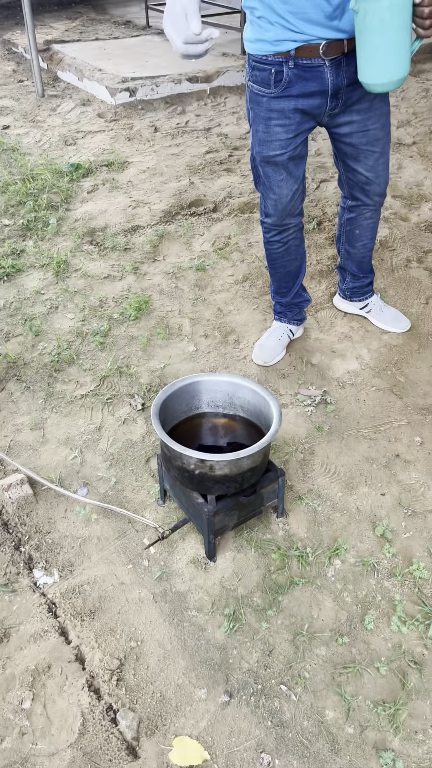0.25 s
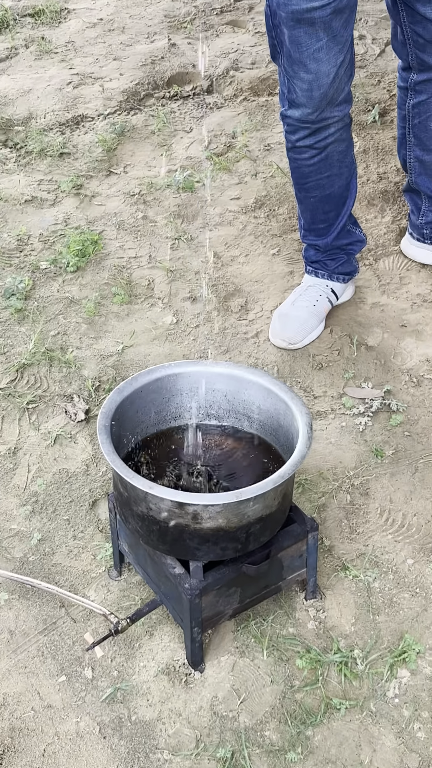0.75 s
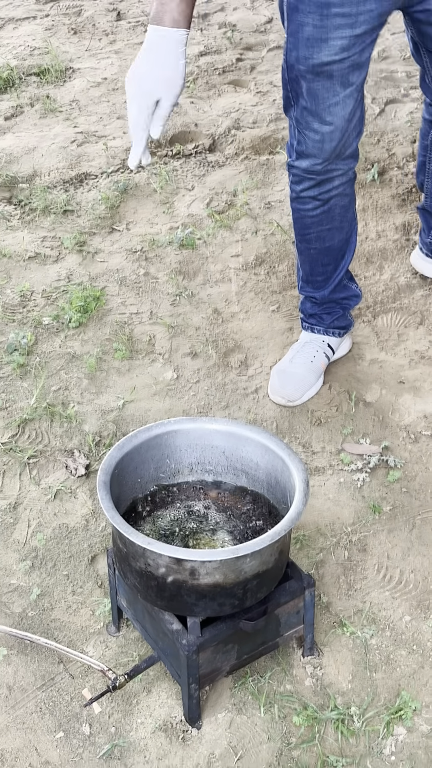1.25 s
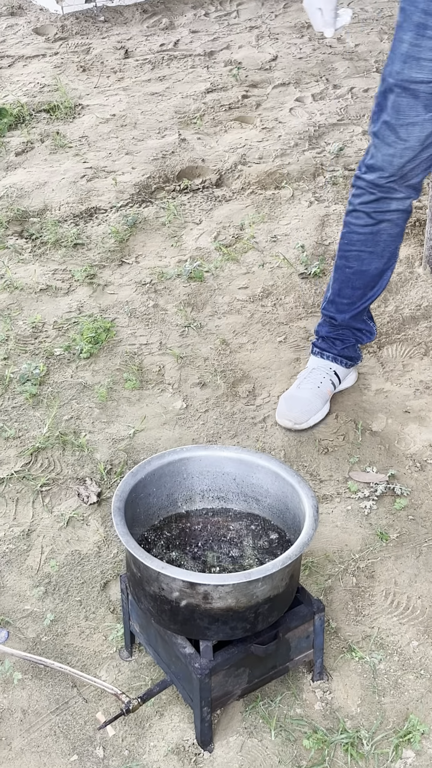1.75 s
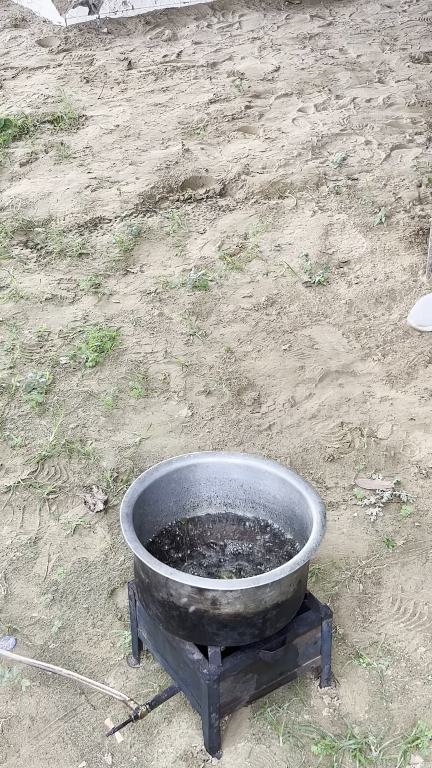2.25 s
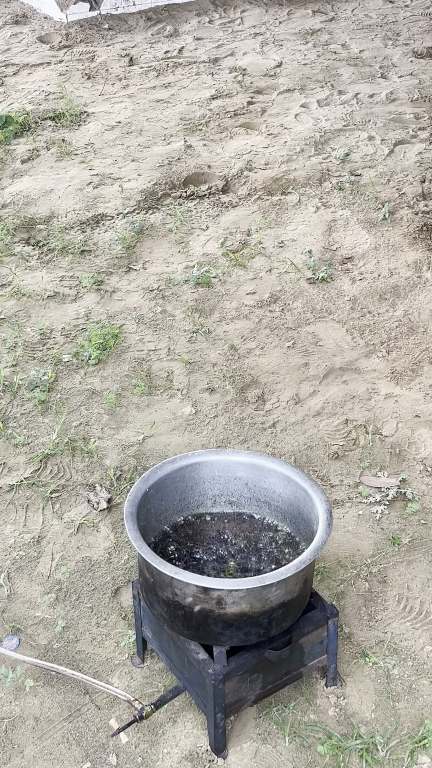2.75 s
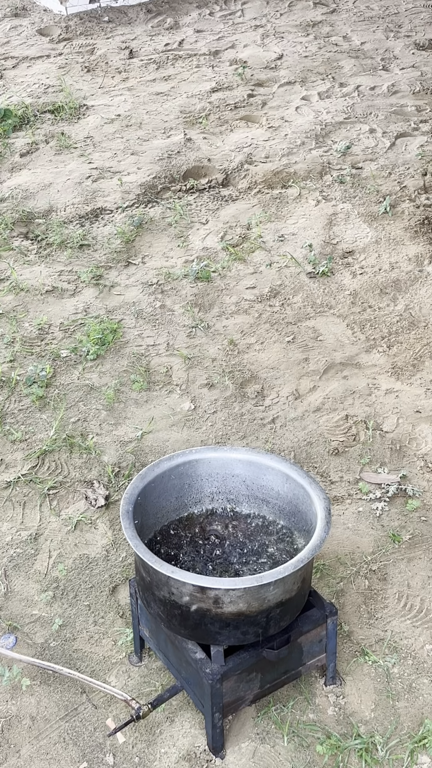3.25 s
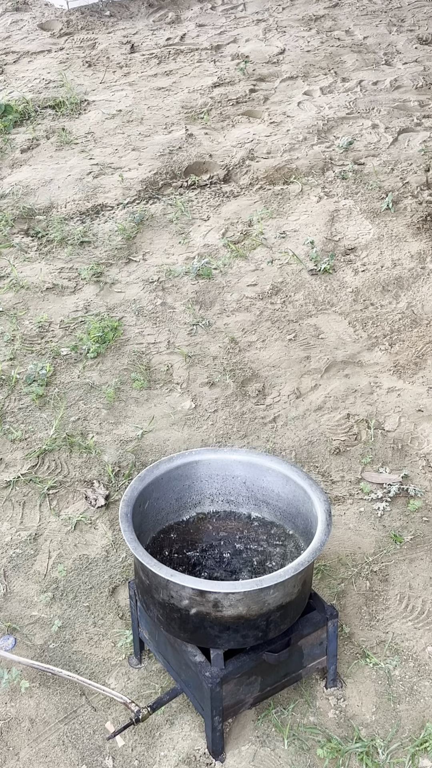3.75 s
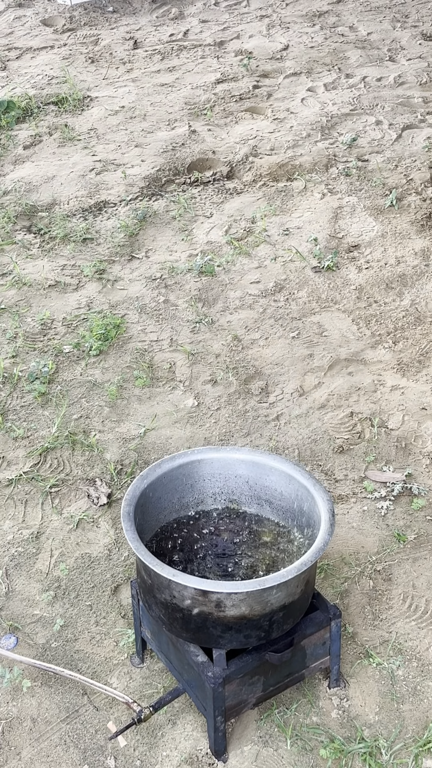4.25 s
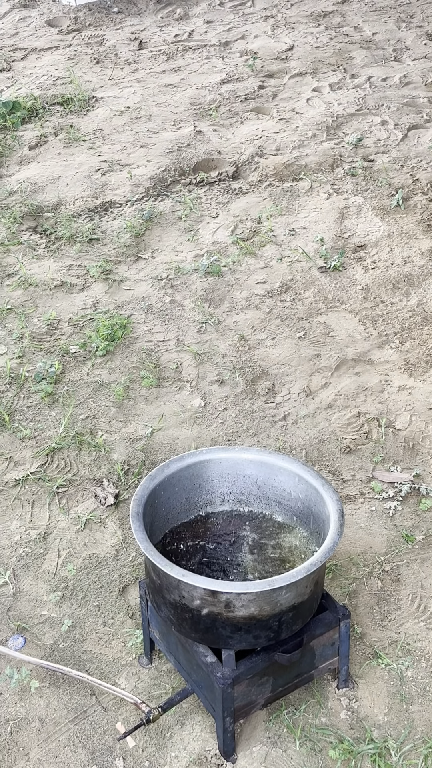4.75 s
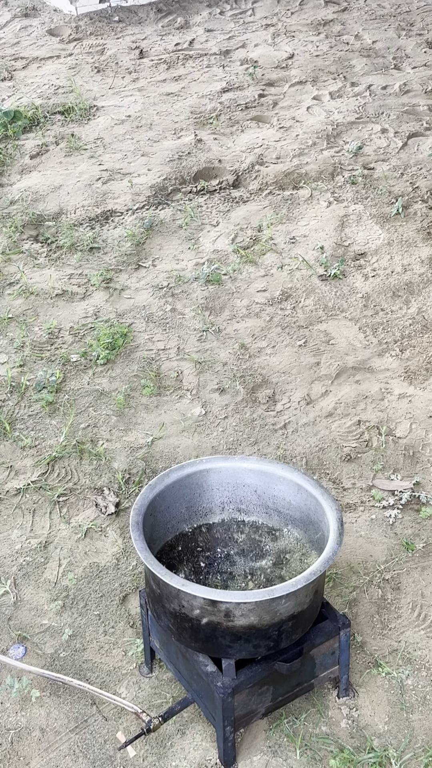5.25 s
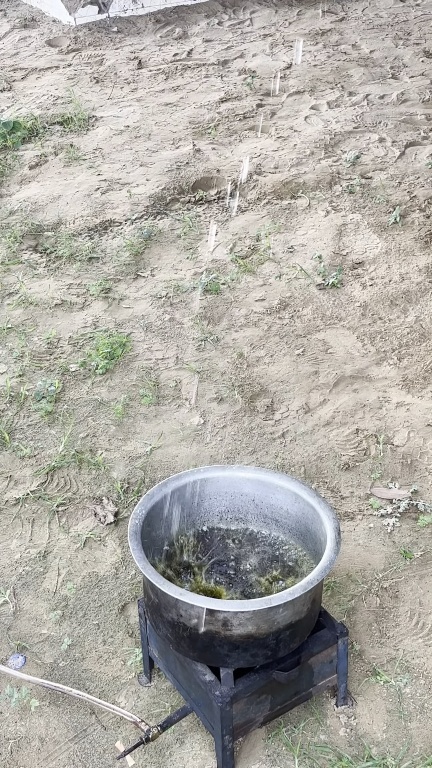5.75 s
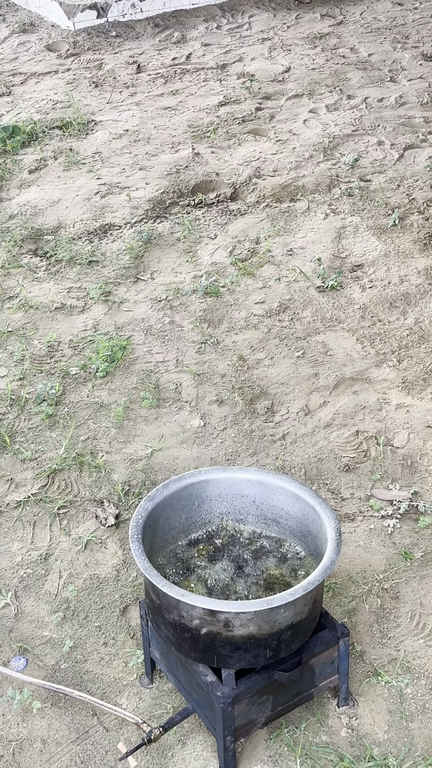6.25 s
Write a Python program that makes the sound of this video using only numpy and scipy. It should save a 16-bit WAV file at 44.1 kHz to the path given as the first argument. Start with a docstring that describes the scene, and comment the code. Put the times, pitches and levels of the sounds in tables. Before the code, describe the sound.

Close stereo pickup in open air with no echo: small droplets snap, then tossed water makes hot oil fry, fine hiss first, then thicker crackle. Bright spits crack out at random. Sunken water boils up in knocking, hollow plops and rough steam sputters that ring the metal pot, growing loud midway. A fresh brief sizzle comes late. Behind lie a steady burner rush, low rumble, a fading engine hum and a wavering distant drone.

```python
"""Water is tossed into hot oil in a large metal pot on a gas stove, out of doors.
The oil sizzles and spits: random clicks ring at the pitches of small and large bursting bubbles.
As the water sinks and boils, steam bubbles plop harder in the pot's hollow, as short swelling tones.
A second, smaller splash revives the sizzle near the end.
Behind it the burner rushes as filtered noise, and far engines hum as wavering sine tones."""
import sys
import numpy as np
from scipy import signal
from scipy.fft import rfft, irfft, next_fast_len
from scipy.io import wavfile
from scipy.ndimage import uniform_filter1d

SR = 44100
rng = np.random.default_rng(int(sys.argv[2]) if len(sys.argv) > 2 else 0)


def digitize_waveform(pressure):
    """Quantize a signal to 16-bit integers and store it at the path in sys.argv[1].

    Rows of a 2-D input are taken as channels; values are limited to [-1, 1].
    """
    field = np.atleast_2d(pressure).T
    bounded = np.clip(field, -1, 1)
    quanta = np.round(bounded * 32767).astype(np.int16)
    wavfile.write(sys.argv[1], SR, quanta)


N = 286209
TIME = np.arange(N) / SR  # seconds
PADDED = 2 * next_fast_len(N // 2 + 4096)  # room for filter tails
HZ = np.arange(PADDED // 2 + 1) * SR / PADDED


def from_db(db):
    """Turn decibels into gain."""
    return 10 ** (np.asarray(db) / 20)


def rms_one(x):
    """Scale to an rms of 1."""
    return x / np.sqrt(np.mean(x ** 2) + 1e-20)


def in_time(rows):
    """Draw each column of a table as a curve over time."""
    seconds, *columns = np.transpose(rows)
    return [np.interp(TIME, seconds, column) for column in columns]


def over_hz(points):
    """Join the points of a spectrum along a log-frequency axis."""
    hz, value = np.transpose(points)
    return np.interp(np.log(HZ + 1), np.log(hz), value)


def colour(x, points):
    """Shape the spectrum with a minimum-phase filter, so that nothing sounds before its cause."""
    cepstrum = irfft(np.log(from_db(over_hz(points))))
    # Folding the second half onto the first gives the minimum phase.
    cepstrum[1:PADDED // 2] *= 2
    cepstrum[PADDED // 2 + 1:] = 0
    response = np.exp(rfft(cepstrum))
    return irfft(rfft(x, PADDED) * response)[..., :N]


def resonance(x, hz, width_hz):
    """Ring at one pitch: a two-pole band-pass with a gain of 1 at its top."""
    r = np.exp(-np.pi * width_hz / SR)
    feed = np.array([1, 0, -1]) * (1 - r * r) / 2
    feedback = [1, -2 * r * np.cos(2 * np.pi * hz / SR), r * r]
    return signal.lfilter(feed, feedback, x + 1e-18)


def drift(rate):
    """Wander at random with an rms of 1, taking a new value `rate` times a second."""
    knots = rng.standard_normal(2 * N // 100)
    return rms_one(np.interp(TIME * rate, np.arange(len(knots)), knots))


def add(out, s, sound):
    """Mix a short sound in at a given second."""
    at = int(np.clip(s * SR, 0, N))
    out[..., at:at + sound.shape[-1]] += sound[..., :N - at]


# Spectrum of the burner. Each row: frequency in Hz, relative level in dB.
BURNER_COLOUR = [(100, -2.5), (210, -2), (320, -11), (500, -8.5), (750, -17.5), (1900, -25.5), (2800, -31),
                 (4800, -33), (9000, -42.5), (15000, -66)]


def burner():
    """Burning gas rushes steadily: noise, mostly alike on both sides."""
    rush = rng.standard_normal(N) + from_db(-17.0) * rng.standard_normal((2, N))
    return from_db(-36.5) * rms_one(colour(rush, BURNER_COLOUR))


# Spectrum of the low rumble. Each row: frequency in Hz, relative level in dB.
RUMBLE_COLOUR = [(20, -6), (38, -28), (82, 1.5), (105, -5.5), (200, -8.5), (320, -15), (800, -53.5)]


def rumble():
    """A low rumble: noise with most of its strength in the bass."""
    return from_db(-33.0) * rms_one(colour(rng.standard_normal(N), RUMBLE_COLOUR))


def hum(hz, level_db):
    """A sine tone whose pitch wanders a little; the level is its rms."""
    turns = np.cumsum(hz * (1 + 0.0021 * drift(rate=10))) / SR
    return from_db(level_db) * np.sqrt(2) * np.sin(2 * np.pi * turns)


# A far engine's path. Each row: time in seconds, middle pitch in Hz, rms level in dB.
ENGINE_PATH = [(0, 58.46, -27.5), (1.9, 57.76, -28), (2.8, 56, -31.5), (3.45, 55.36, -42.5),
               (6.49, 56.6, -38)]


def engines():
    """Two far engines hum: one changes pitch and level, the other fades between 1 and 3 seconds."""
    engine_hz, engine_db = in_time(ENGINE_PATH)
    second_db = np.interp(TIME, [1, 3], [-34, -41])
    return hum(engine_hz, engine_db) + hum(82.25, second_db)


# A distant drone comes and goes.
# Each row: start and end of the full part in seconds, middle pitch in Hz, rms level in dB before wavering.
DRONES = [(0.25, 0.6, 182.3, -37), (2.1, 2.203, 178, -35.5), (2.548, 3.31, 151.3, -35.5),
          (3.74, 4.1, 148.3, -32), (4.703, 5.083, 144.4, -31), (5.29, 5.62, 147, -30.5)]


def drones():
    """A distant drone: tones that waver in level and fade in and out at their ends."""
    out, fade_db_per_s = np.zeros(N), 56
    waver_db = 1.4 * drift(rate=13)
    for start_s, end_s, hz, level_db in DRONES:
        seconds_outside = np.abs(TIME - np.clip(TIME, start_s, end_s))
        out += hum(hz, level_db + waver_db - fade_db_per_s * seconds_outside)
    return out


SIDE_DB = -12.5  # clicks that differ between left and right, against the central ones


def bursts(per_s, spread_db):
    """Random clicks of uneven size; those off the pot's centre differ between left and right."""
    sizes = from_db(spread_db * np.minimum(rng.exponential(1, (2, N)), 5))
    sizes = sizes * rng.choice([-1, 1], (2, N))
    mid, side = sizes * (rng.random((2, N)) < per_s / SR)
    return mid + from_db(SIDE_DB) * side * [[1], [-1]]


ONSET_DB_PER_S = 300  # how fast the frying catches
# Water lands in the oil; a small splash boils off sooner.
# Each row: time in seconds, level change in dB, pace of boiling off (as a factor),
# extra for the spray in dB (scaled by the setting `spray` below).
SPLASHES = [(0.7, 0.5, 0.93, -1.5), (5.72, -1.5, 3.8, 0.5)]


def boil_off(peak_db, lag_s, swell_db, swell_s, hold_s, fade_db_per_s, stray_db, spray=0):
    """Level in dB of one size of bubble: each splash catches, swells, holds and fades, over stray drops."""
    power = from_db(stray_db) ** 2
    for s, splash_db, pace, spray_db in SPLASHES:
        age = TIME - s - lag_s
        attack = ONSET_DB_PER_S * np.minimum(age, 0)
        attack = attack - swell_db * np.exp(-np.maximum(age, 0) / swell_s)
        release = fade_db_per_s * np.maximum(pace * age - hold_s, 0)
        power = power + from_db(peak_db + splash_db + spray * spray_db + attack - release) ** 2
    return 10 * np.log10(power)


def spray_level():
    """Level of the finest spray in dB; it answers a splash first."""
    return boil_off(peak_db=-36.5, lag_s=0.005, swell_db=16.5, swell_s=0.14, hold_s=0.99,
                    fade_db_per_s=4.0, stray_db=-55.0, spray=0.94)


def ticks():
    """Tiny droplets snap at random along with the spray, the first ones ahead of the main splash."""
    clicks = bursts(130, spread_db=4.5)
    high = resonance(clicks, 8600, width_hz=2700)
    low = resonance(clicks, 4560, width_hz=360)
    snaps = rms_one(high + from_db(7.0) * low)
    first_drops = np.interp(TIME, [.27, .3, .7], [0, .6, 1])
    return first_drops * from_db(spray_level() - 3.5) * snaps


# Flurries of tiny bubbles of like size, where a little water meets the oil.
# Each row: middle in seconds, half-width in seconds, middle pitch in Hz, level at the middle in dB.
FLURRIES = [(0.317, 0.015, 3680, -48), (0.385, 0.02, 4200, -51), (0.501, 0.039, 3260, -43.5),
            (0.614, 0.033, 2930, -42.5), (0.668, 0.015, 2750, -39.5), (0.72, 0.0098, 3170, -38),
            (0.815, 0.05, 1890, -35), (1.31, 0.067, 12100, -33.5), (4.35, 0.025, 4060, -33.5),
            (5.308, 0.037, 7740, -39), (5.511, 0.0039, 2960, -23)]


def flurries(count=5):
    """A quick run of tiny bubbles, each ringing near the flurry's pitch."""
    out, t = np.zeros(N), TIME[:SR // 4] - TIME[SR // 8]
    for s, width_s, hz, level_db in FLURRIES:
        struck = rng.random((count, len(t))) < 900 / count / SR  # 900 bubbles a second in all
        clicks = rng.standard_normal((count, len(t))) * struck
        pitches = hz * (1 + 0.11 * np.linspace(-1, 1, count))
        rings = sum(resonance(c, pitch, width_hz=pitch / 28) for c, pitch in zip(clicks, pitches))
        swell = np.exp(-(t / width_s) ** 2)
        add(out, s + t[0], from_db(level_db) * swell * rms_one(rings))
    return out


# Spectrum of the spits. Each row: frequency in Hz, gain in dB.
SPIT_COLOUR = [(1100, 2), (2200, -2.5), (9000, -0.5), (13000, -8.5)]
# The droplets whose bursts stand out of the frying.
# Each row: start in seconds, relative level in dB, centre frequency in Hz.
SPITS = [(0.3622, -36, 4400), (0.396, -39, 5500), (0.422, -30.5, 2300), (0.497, -40, 11500),
         (0.56, -34, 7950), (0.5864, -27, 3480), (0.713, -33.5, 4500), (1.2697, -24, 7000),
         (1.2905, -19, 11000), (1.501, -20, 8900), (2.0585, -27, 7950), (2.4098, -24.5, 9600),
         (2.4958, -14.5, 5060), (2.5375, -18, 3650), (2.6354, -19.5, 8440), (2.6724, -21, 6500),
         (2.8318, -17, 8160), (2.9042, -12.5, 2240), (2.9315, -23, 7000), (2.945, -20, 8600),
         (3.063, -19.5, 7800), (3.1898, -18, 3630), (3.265, -16.5, 8140), (3.2836, -24, 7300),
         (3.6033, -19, 2035), (3.66, -29, 9200), (3.847, -36, 8000), (3.932, -16, 2300),
         (3.982, -23.5, 7500), (4.0853, -20.5, 9100), (4.158, -17, 3140), (4.22, -23, 3300),
         (4.408, -26, 3220), (4.494, -26, 5000), (4.5155, -26.5, 8000), (4.5403, -30, 8200),
         (5.0417, -19.5, 7300), (5.1424, -19, 2190), (5.254, -24.5, 7960), (5.284, -13, 8240),
         (5.7947, -24, 6100), (5.816, -27, 6000), (5.985, -25, 10100), (6.03, -28, 7900),
         (6.059, -22, 4940), (6.227, -19, 3220), (6.243, -19, 4030)]


def spits():
    """A droplet flashes to steam: a short crack, a scatter from the pot's wall, a fizz unlike the others'."""
    out, t = np.zeros((2, N)), TIME[:SR // 8]
    for s, level_db, hz in SPITS:
        age = t * hz / 0.64  # the crack swells in about two thirds of a cycle
        crack = age * np.exp(1 - age) * np.sin(2 * np.pi * hz * t)
        snap_noise = np.exp(-t / 0.00083) * rng.standard_normal(len(t))
        snap = resonance(snap_noise, hz, width_hz=1.1 * hz)
        scatter = from_db(-21.5) * np.exp(-t / 0.003)
        fizz = from_db(-29.5 + 1.7 * rng.standard_normal()) * np.exp(-t / 0.023)
        tail_noise = (scatter + fizz) * rng.standard_normal((2, len(t)))
        tail = 1.38 * resonance(tail_noise, hz, width_hz=hz)
        spit = crack + snap + tail
        first_ms = spit[:, :SR // 1000]
        add(out, s, from_db(level_db + 4.0) * spit / np.std(first_ms))
    return colour(out, SPIT_COLOUR)


def evened(x, span_s):
    """Hold the level at 1 over each span, with the grain left in."""
    power = uniform_filter1d(np.mean(x ** 2, axis=0), int(span_s * SR) + 1)
    return x / np.sqrt(power + 1e-12)


def ringing(clicks, low_hz, high_hz, quality, snap_db, count=50):
    """Each burst snaps, then rings for some cycles at the pitch of its bubble's size."""
    dealt = rng.integers(0, count, N)  # a random size for each click
    pitches = np.geomspace(low_hz, high_hz, count)
    rings = sum(resonance(clicks * (dealt == k), hz, hz / quality) for k, hz in enumerate(pitches))
    return rings + from_db(snap_db) * clicks


# Air in the pot. Each row: resting pitch in Hz, width in Hz, middle lift in dB.
POT_AIR = [(406, 104, 3.5), (540, 170, 12), (660, 44, 7), (1058.4, 65, 18.5), (1150, 63, 3.5),
           (2540, 72, 7.5), (3012, 290, 11)]


def pot(x):
    """The air in the pot rings; swirling steam shifts its pitches, and moving bursts drive it unevenly."""
    out, shift = x, np.cumsum(1 + 0.017 * drift(rate=30)) / SR
    for hz, width_hz, lift_db in POT_AIR:
        # Turn the resonance down to 0 Hz, smooth it there, then turn it back up.
        turn, r = np.exp(2j * np.pi * hz * shift), np.exp(-np.pi * width_hz / SR)
        ring = 2 * (turn * signal.lfilter([1 - r], [1, -r], x * turn.conj())).real
        uneven = from_db(drift(rate=45))
        out = out + (from_db(lift_db) - 1) * uneven * ring
    return out


def burst_rate():
    """Bursts per second: steam bubbles merge and grow fewer after the first splash."""
    first_per_s, last_per_s, merge_s = 2000, 300, 2.1
    age = np.maximum(TIME - SPLASHES[0][0], 0)
    merged = 1 - np.exp(-(age / merge_s) ** 2)
    return first_per_s + (last_per_s - first_per_s) * merged


# Vigour of the sunken water's boil. Each row: time in seconds, relative level in dB.
BOIL_VIGOUR = [(0.7, -51), (0.83, -33.5), (1.04, -32), (1.42, -31.5), (1.91, -23.5), (2.75, -18.5),
               (3.0, -22), (3.5, -18), (4.55, -25), (4.86, -20), (5.12, -30), (5.42, -24), (5.71, -28),
               (5.91, -28), (6.05, -23.5), (6.49, -30.5)]


def boil_level():
    """How hard the sunken water boils, held back until it has sunk; in dB."""
    vigour_db, = in_time(BOIL_VIGOUR)
    return vigour_db + np.interp(TIME, [.7, .82], [-14, 0])


# Spectrum of the boil. Each row: frequency in Hz, gain in dB.
BOIL_COLOUR = [(100, -16), (200, -0.5), (270, 0.5), (340, -1), (450, 5.5), (700, 0), (860, -3),
               (1100, -14.5), (2000, -4.5), (5000, -86)]


def boil(surge_db):
    """Boiling steam pockets burst at low pitches and ring the pot, stirred up by the large bubbles."""
    pockets = bursts(burst_rate(), spread_db=0.1) * from_db(surge_db)
    pockets = pockets + 1.2 * pockets.mean(axis=0)  # long waves reach both sides alike
    pockets = ringing(pockets, low_hz=197.4, high_hz=1308, quality=15.2, snap_db=-16.0)
    level = np.sqrt(from_db(boil_level() - 0.94) ** 2 + churn())
    return level * evened(pot(colour(pockets, BOIL_COLOUR)), span_s=0.028)


# Spectrum of the crackle. Each row: frequency in Hz, gain in dB.
CRACKLE_COLOUR = [(200, -17.5), (600, 8), (900, 1), (1400, 2), (2000, 1.5), (2400, 3), (2700, -14),
                  (3300, -6), (5000, -7), (12000, -86.5)]


def crackle(surge_db):
    """Small bubbles burst at middle pitches, more often than the steam pockets, and ring the pot."""
    level_db = boil_off(peak_db=-20.5, lag_s=0.13, swell_db=16.5, swell_s=0.49, hold_s=1.17,
                        fade_db_per_s=3.0, stray_db=-60)
    small = bursts(2.1 * burst_rate(), spread_db=3.0) * from_db(surge_db)
    small = ringing(small, low_hz=706.4, high_hz=4054, quality=20.4, snap_db=-18.5)
    return from_db(level_db) * evened(pot(colour(small, CRACKLE_COLOUR)), span_s=0.33)


# Spectrum of the sizzle. Each row: frequency in Hz, gain in dB.
SIZZLE_COLOUR = [(800, -11), (2000, 9), (2700, 0.5), (3300, 2), (4500, 0.5), (5500, -5.5), (7500, -5),
                 (15000, -51)]


def sizzle(surge_db):
    """Fine bubbles burst at high pitches, half as clustered, and ring the pot."""
    level_db = boil_off(peak_db=-26.0, lag_s=0.058, swell_db=12, swell_s=0.28, hold_s=0.88,
                        fade_db_per_s=4.5, stray_db=-45.0)
    fine = bursts(1600, spread_db=3.0) * from_db(.5 * surge_db)
    fine = ringing(fine, low_hz=2350, high_hz=7500, quality=66, snap_db=-18.5)
    return from_db(level_db) * evened(pot(colour(fine, SIZZLE_COLOUR)), span_s=0.46)


# Spectrum of the spray. Each row: frequency in Hz, gain in dB.
SPRAY_COLOUR = [(2500, -9), (5000, 17.5), (7000, 11.5), (9000, 12.5), (10800, 8), (12500, 11), (16000, -7)]


def spray():
    """The finest bubbles burst as bare clicks that flicker in level."""
    finest = bursts(4500, spread_db=1.5) * from_db(2.7 * drift(rate=51))
    return from_db(spray_level()) * evened(colour(finest, SPRAY_COLOUR), span_s=1.0)


def frying():
    """Four sizes of bursting bubble together, rising to full level as the water lands."""
    surge_db = drift(rate=70)  # bubbles burst in clusters
    water_lands = from_db(np.interp(TIME, [.25, .6, .72], [-40, -14, 0]))
    return water_lands * (boil(surge_db) + crackle(surge_db) + sizzle(surge_db) + spray())


def puff(hz):
    """A short, rough gasp of steam: noise ringing near one pitch, with rms 1 over its first 5 ms."""
    age = TIME[:SR // 20] / 0.0034  # crest after 3.4 ms
    steam = resonance(rng.standard_normal(len(age)), 1.3 * hz, width_hz=2200)
    gasp = age * np.exp(1 - age) * resonance(steam, hz, width_hz=320)
    return gasp / np.std(gasp[:SR // 200])


# The loudest puffs of steam breaking the surface.
# Each row: time near the crest in seconds, relative level in dB.
SPUTTERS = [(0.845, -22), (1.447, -14.5), (2.956, -9), (3.196, -16), (3.263, -16), (3.73, -16),
            (3.754, -15), (3.807, -13), (4.085, -16), (4.153, -13), (4.222, -10), (4.41, -16), (4.607, -13),
            (4.629, -17), (4.953, -12.5), (5.002, -13.5), (5.142, -9.5), (5.205, -14), (5.444, -14.5),
            (5.773, -17), (5.792, -16), (5.885, -22), (5.947, -15.5), (6.016, -13), (6.244, -15)]


def sputters():
    """Steam tears through the surface and sounds the pot's upper air resonance."""
    out = np.zeros(N)
    for s, level_db in SPUTTERS:
        add(out, s - .003, from_db(level_db - 9) * puff(1030))
    return out


def bubble(hz, swell_s, rise):
    """A tone that swells, dies away and climbs a little in pitch; its envelope peaks at 1."""
    t = TIME[:SR // 8]
    age = t / swell_s
    climbing_hz = hz * (1 + rise * np.tanh((age - 1) / 2))
    return age * np.exp(1 - age) * np.sin(2 * np.pi * np.cumsum(climbing_hz) / SR)


# Deep gulps under the oil. Each row: start in seconds, peak level in dB, pitch at the peak in Hz.
GULPS = [(3.337, -15, 247), (3.827, -18.5, 237), (3.904, -19, 222), (4.764, -19, 241), (4.817, -15.5, 252),
         (5.82, -24.5, 271), (6.415, -20.5, 274)]
# The largest steam bubbles.
# Each row: time of the peak in seconds, peak level in dB, pitch at the peak in Hz,
# rebound level in dB against the peak.
PLOPS = [(1.406, -19, 550, -2.5), (2.204, -14, 538, -17), (2.549, -15, 624, -13), (2.951, -10, 640, -24),
         (3.141, -5, 590, -14), (3.199, -11.5, 586, -21), (3.231, -13, 533, -24), (3.435, -8.5, 406, -20),
         (3.654, -9, 485, -18), (3.731, -9.5, 540, -24), (3.837, -10.5, 530, -5), (3.92, -7.5, 520, -11),
         (3.978, -12, 506, -5), (4.012, -14, 540, -6), (4.145, -9.5, 513, -10), (4.162, -14, 556, -17),
         (4.19, -12, 513, -15), (4.256, -6.5, 654, -21), (4.294, -10, 547, -7), (4.412, -9, 527, -4),
         (4.518, -12.5, 540, -20), (4.702, -15, 550, -19), (4.71, -11, 534, -8.5), (4.743, -15, 540, -18),
         (4.771, -11.5, 493, -18), (4.815, -7, 540, -7), (4.847, -10, 580, -15), (4.988, -14, 595, -9),
         (5.002, -7.5, 570, -7.5), (5.053, -10.5, 567, -17), (5.163, -9, 527, -4), (5.214, -12, 540, -12),
         (5.326, -12, 487, -4), (5.365, -12.5, 483, -25), (5.453, -13, 458, -17), (5.541, -5.5, 540, -6.5),
         (5.886, -13, 660, -28), (6.002, -11, 577, -4.5), (6.151, -17, 678, -7), (6.218, -19, 452, -10),
         (6.415, -11, 600, -30), (6.44, -14.5, 565, -12)]


def plops():
    """Large steam bubbles collapse, rebound and puff into the pot's upper air; deep gulps join them."""
    out, swell_s = np.zeros(N), .0025
    for s, peak_db, hz, rebound_db in PLOPS:
        add(out, s - swell_s, from_db(peak_db) * bubble(hz, swell_s, rise=0.01))
        add(out, s - swell_s, from_db(peak_db - 20.0) * puff(910))
        rebound = bubble(541.4, swell_s=0.006, rise=0.012)
        add(out, s + 0.00518, from_db(peak_db + rebound_db) * rebound)
    for s, peak_db, hz in GULPS:
        add(out, s, from_db(peak_db) * bubble(hz, swell_s=0.011, rise=0.21))
    return out


def churn():
    """Power of the boiling that each large bubble stirs up: it builds quickly and settles more slowly."""
    under_peak_db, rise_s, fall_s = -10.5, .004, 0.019
    power = np.zeros(N)
    for s, peak_db, _, _ in PLOPS:
        age = TIME - s
        decay = np.minimum(np.maximum(-age / rise_s, age / fall_s), 20)
        power += from_db(peak_db + under_peak_db) ** 2 * np.exp(-decay)
    return power


def scene():
    """The pot in front, the yard behind; open air adds no echo."""
    background = burner() + rumble() + engines() + drones()
    return background + ticks() + flurries() + spits() + frying() + sputters() + plops()


LOW_CUT_HZ, TOP_CUT_HZ = 33, 16000
# Phase between two microphone ports. Each row: frequency in Hz, lead of the left in radians.
PORT_PHASE = [(0, 0), (500, -.45), (800, .1), (1400, -.2), (2000, .7), (2550, 2.25), (3700, .9),
              (5000, 1.4), (6000, 3.14), (16500, 18.4)]
# Balance between the ports. Each row: frequency in Hz, left over right in dB.
PORT_BALANCE = [(90, 0), (400, -1.5), (700, -1.7), (1120, 4.5), (1800, .5), (4000, 0)]


def record(dry):
    """Two spaced ports shift and tilt the channels; the lowest bass and the top are cut, peaks rounded."""
    # Left gets half of each difference, right the opposite half.
    half_lead = np.exp(.5j * np.interp(HZ, *np.transpose(PORT_PHASE)))
    half = from_db(over_hz(PORT_BALANCE) / 2) * half_lead
    low_cut = 1 - 1 / (1 + (HZ / LOW_CUT_HZ) ** 8)
    ports = irfft(rfft(dry, PADDED) * low_cut * np.array([half, 1 / half]))[:, :N]
    rounded = ports / (1 + (ports / .95) ** 8) ** (1 / 8)
    top_cut = signal.ellip(10, .1, 80, TOP_CUT_HZ, fs=SR, output="sos")
    return signal.sosfilt(top_cut, rounded)


dry = scene()
out = record(dry)
digitize_waveform(out)
```